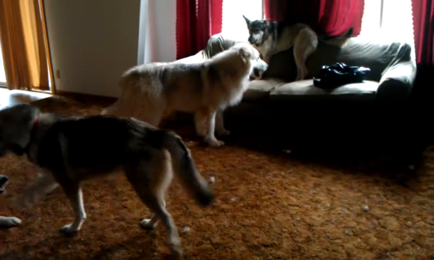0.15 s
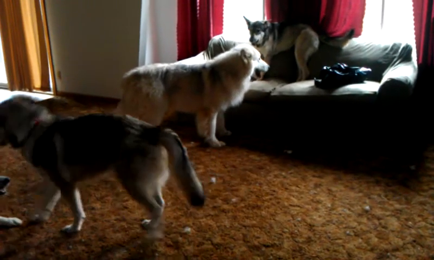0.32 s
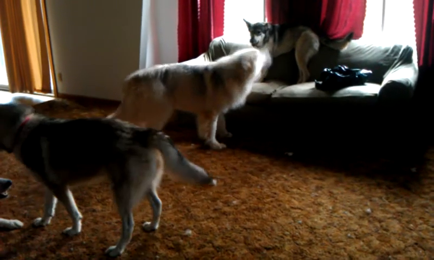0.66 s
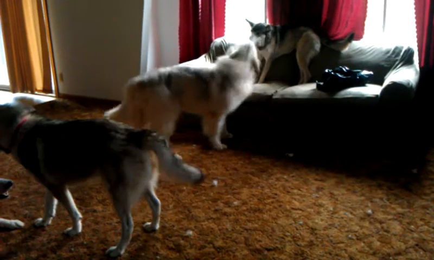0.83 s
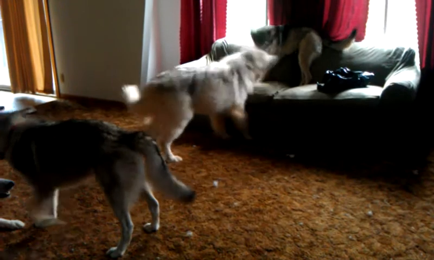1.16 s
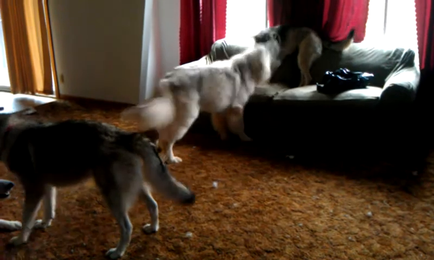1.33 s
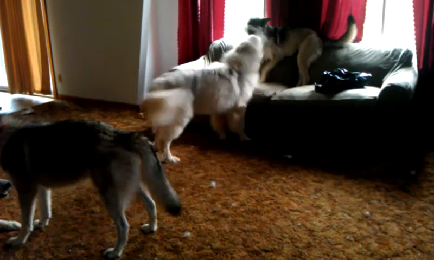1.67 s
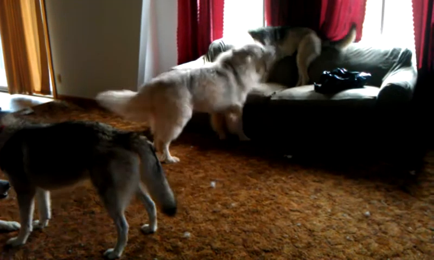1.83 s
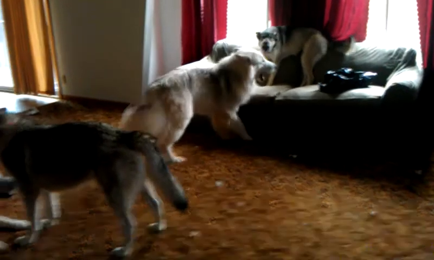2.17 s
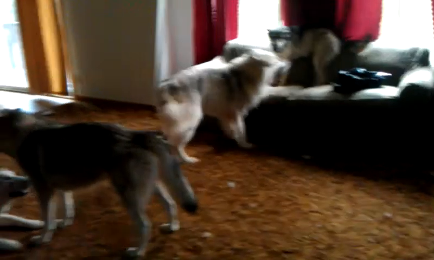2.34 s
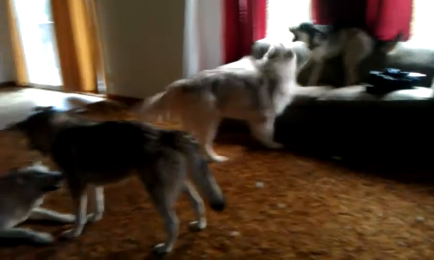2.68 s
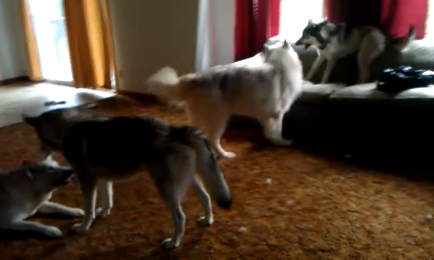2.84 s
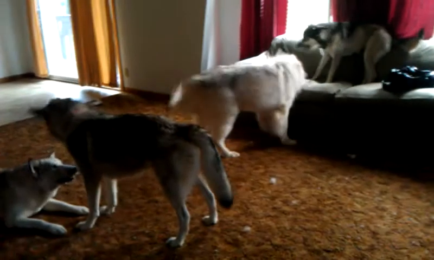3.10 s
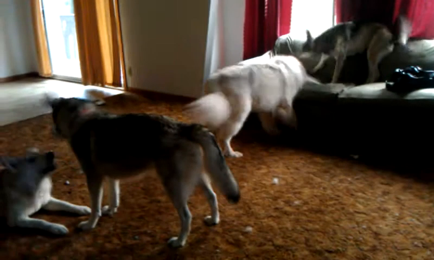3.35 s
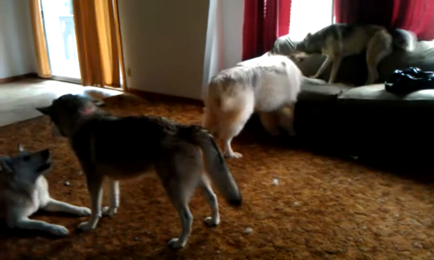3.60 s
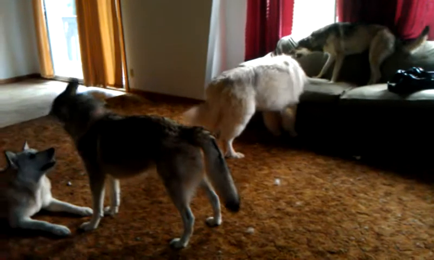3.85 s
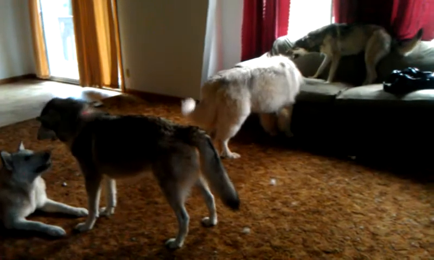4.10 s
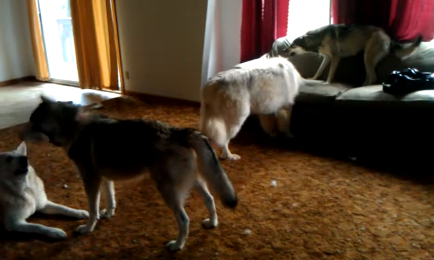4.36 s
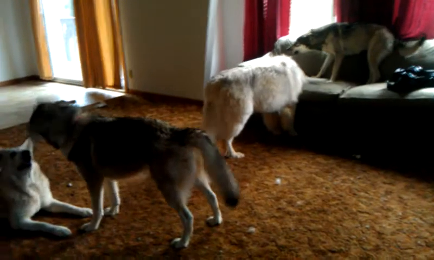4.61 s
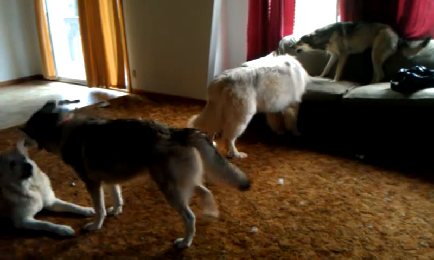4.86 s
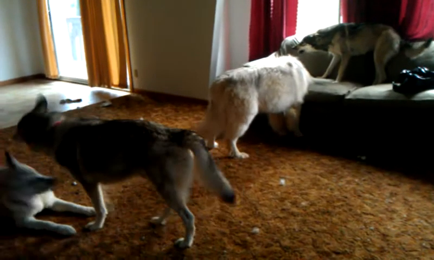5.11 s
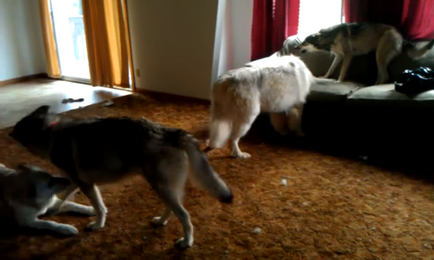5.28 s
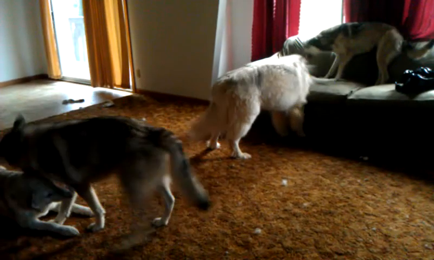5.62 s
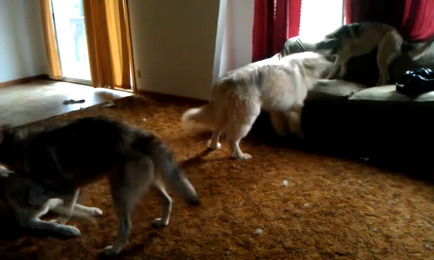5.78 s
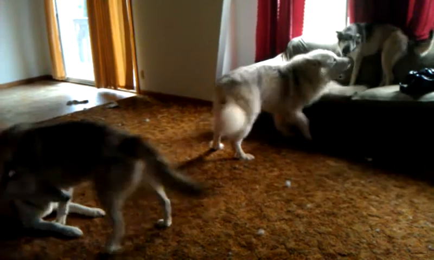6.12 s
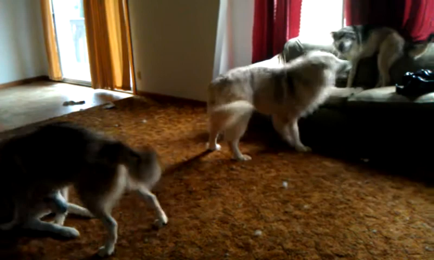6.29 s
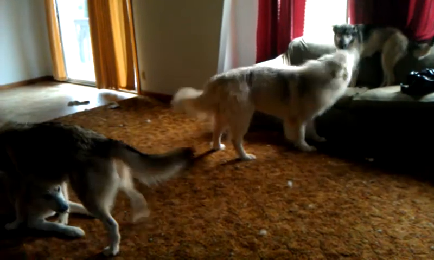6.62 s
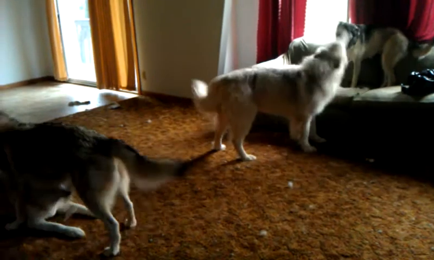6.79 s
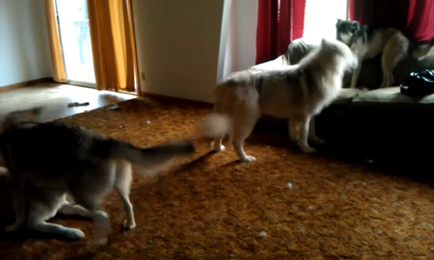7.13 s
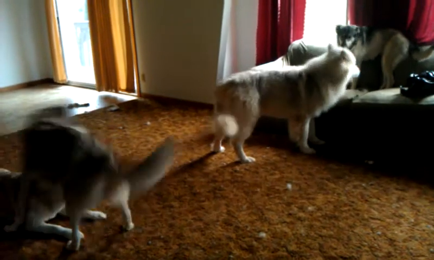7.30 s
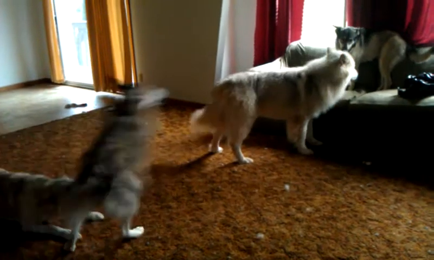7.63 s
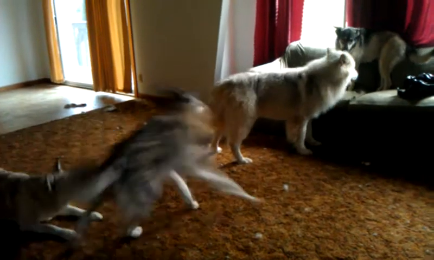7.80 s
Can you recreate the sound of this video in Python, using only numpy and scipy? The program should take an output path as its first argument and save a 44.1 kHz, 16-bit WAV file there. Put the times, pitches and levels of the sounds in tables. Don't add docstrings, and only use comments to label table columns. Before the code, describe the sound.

High-pitched yips, hoarse barks and a few round woofs from playing dogs echo indoors over faint hum, then fall quiet to soft carpet steps.

```python
import sys
import numpy as np
from scipy import signal
from scipy.fft import rfft, irfft, next_fast_len
from scipy.io import wavfile
from scipy.ndimage import map_coordinates

SR = 44100
rng = np.random.default_rng(int(sys.argv[2]) if len(sys.argv) > 2 else 0)


def digitize_waveform(pressure):
    field = np.atleast_2d(pressure).T
    bounded = np.clip(field, -1, 1)
    quanta = np.round(bounded * 32767).astype(np.int16)
    wavfile.write(sys.argv[1], SR, quanta)


def to_linear_factor(level_db):
    exponent = np.asarray(level_db, float) / 20
    return 10 ** exponent


N = 350771


def dogs():
    # full voice at t/s, hold t/s, pitch f/Hz, level/dB,
    # mouth resonance [multiples of the pitch]
    barks = [
        (2.065, 0.069, 680.8, -14, 2.3),
        (2.57, 0.1, 696.5, -21, 2.2),
        (3.635, 0.071, 673.8, -20, 2.1),
        (4.155, 0.077, 673.8, -19, 2.1),
        (4.755, 0.084, 635, -21.5, 1.9),
        (5.605, .085, 642.3, -19.5, 2.1),
        (6.195, 0.095, 664, -18, 2.7),
    ]
    yelps = [
        (.542, 0.051, 609.7, -12, 3.86),
        (.74, 0.053, 522.8, -15, 3.62),
        (5.415, 0.074, 568.8, -18, 4.8),
    ]
    swells = [
        (1.05, 0.058, 551.1, -10, 3.52),
        (1.765, .05, 545.3, -11, 3.51),
        (5.85, .065, 520.1, -16, 3.05),
    ]
    woofs = [
        (6.06, .09, 452.8, -13.5, 2.51),
        (6.645, .03, 398.6, -16, 1.3),
        (6.93, 0.06, 446, -20, 2.13),
    ]
    whines = [
        (.235, 0.016, 816, -32.5, 2.05),
        (1.64, 0.027, 595, -26, 2.05),
        (7.22, .025, 591.3, -25.5, 2.18),
    ]
    cries = [
        (.512, .015, 530, -36, 2.2),
        (5.385, .015, 530, -41.5, 1.55),
        (2.9, 0.061, 577.6, -30.5, 2.4),
        (3.08, 0.083, 528.7, -20, 3),
        (5.785, 0.069, 522, -27, 2.14),
    ]
    gruffs = [
        (2.415, .05, 525.8, -19.5, 2.7),
        (.99, 0.038, 503.6, -28.5, 1.7),
        (1.225, 0.036, 706.5, -26, 0.88),
        (2.355, .06, 610.6, -19.5, 1.1),
        (3.335, 0.043, 716.5, -19, 2.3),
        (6.395, 0.035, 409.2, -21, 3.5),
        (6.9, .1, 647.7, -31.5, 0.98),
    ]
    joins = [
        (.538, 0.017, 528.3, -20.5, 2.05),
        (.63, .03, 428.3, -24, 1.95),
        (1.0, 0.04, 439, -28, 2.05),
        (1.48, .03, 381, -46, 1.9),
        (1.55, .03, 370.5, -52, 2.8),
        (2.105, .03, 455.3, -30, 2.05),
        (2.35, .09, 433.2, -19, 2.05),
        (3.055, 0.024, 448.3, -23.5, 2.05),
        (3.365, 0.024, 447.7, -30.5, 2.05),
        (6.4, .03, 596.3, -28, 1.8),
    ]
    again = [
        (.685, 0.023, 617.3, -28.5, 0.94),
        (.8, .045, 528.8, -14, 4.44),
        (.89, 0.017, 525, -17.5, 0.76),
        (6.455, 0.021, 449.4, -13.5, 1.97),
        (6.505, 0.022, 451, -23.5, 1),
        (6.69, .03, 434.4, -19.5, 2.7),
        (6.725, .04, 427, -20.5, 1.68),
    ]
    coughs = [(.335, .03, 520, -38, 1.1), (.285, .03, 661, -22.5, 1.36), (.625, 0.03, 596.4, -18, 1.34),
              (1.68, 0.035, 522, -21.5, 2.4), (1.71, 0.049, 441.7, -20.5, 2.05),
              (2.63, 0.043, 661.3, -19.5, 1.2), (3.405, 0.019, 694, -26, 1.58),
              (3.63, 0.022, 586.3, -19.5, 0.98), (6.97, .03, 599, -22.5, 0.78),
              (3.745, 0.03, 727, -24.5, 1.43), (4.26, 0.019, 656, -27, 0.88),
              (4.88, 0.026, 639.4, -31.5, 0.88), (6.3, 0.023, 612.4, -22.5, 2.74)]
    # lead-in t/s, how far down it starts level/dB, release t/s,
    # how far down it ends level/dB, fade over the hold level/dB
    breaths = dict(bark=(.055, 33.8, .04, 15, 3.95), yelp=(0.044, 33, 0.036, 13, 3),
               swell=(.035, 21, .04, 20, 2), woof=(0.041, 42, .04, 14, 3.4),
               whine=(.045, 22, .05, 7.7, 3.2), cry=(.045, 19, .04, 8, 4), gruff=(.045, 28, 0.044, 15, 4.7),
               join=(0.019, 19, 0.026, 15, 9), again=(0.02, 31, .035, 15, 3.5),
               cough=(.025, 22, .035, 12, 4.4))
    # how far below it starts [share], settling t/s, climb [share per second]
    glides = dict(bark=(.28, .035, 0), yelp=(.24, .022, -.1), swell=(.04, .02, .05), woof=(.17, .025, .45),
              whine=(.15, .02, 0), cry=(.33, .016, -.25), gruff=(.1, .025, .3), join=(.05, .02, .4),
              again=(.02, .02, .3), cough=(-.06, .03, -.7))
    # shut partials 2 and 3 level/dB, lift at the resonance level/dB,
    # its width [partials], opening at start and at end [0-1]
    mouths = dict(bark=(-5, -8, 13.5, 1.38, -0.4, 0.05), yelp=(-15, -22.5, 21, 1.34, 0.1, 0.8),
              swell=(-19.5, -25.5, 26, 0.81, 1.82, 0.62), woof=(-12, -15, 13, .6, .7, .6),
              whine=(-7, -13, 21.5, 1, 1.2, 0.56), cry=(-7, -11.5, 15.5, 1.68, 1.3, 0.64),
              gruff=(-10.5, -20, 15, 2.7, 2.7, 1.56), join=(-7, -22, 25, .6, .9, .9),
              again=(-17.5, -21, 23.5, 1.18, 0.1, .5), cough=(-10.5, -23.5, 21.5, 0.66, 2.3, 1.04))
    shakes = dict(bark=.08, yelp=.009, swell=.006, woof=.006, whine=.008, cry=.008, gruff=.035, join=.04, again=.006, cough=.045)
    # hoarse noise level/dB, upper partials level/dB, brightness level/dB,
    # final pitch drop [share], room level/dB
    voices = dict(bark=(-8.5, 2.5, -33, .12, -9.5), yelp=(-24.5, -28.5, -39.5, .25, -6.5),
              swell=(-19, -24, -42.5, .25, -12.5), woof=(-21.5, -40, -43, .2, -7.5),
              whine=(-17, -6, -26.5, .3, -5.5), cry=(-14, -8, -29.5, .2, -7.5),
              gruff=(-7, -12, -34.5, .15, -5), join=(-6, -19, -41, .05, -8.5),
              again=(-19, -29, -43.5, .25, -9), cough=(-11.5, -12.5, -31.5, .12, -9.5))
    # start t/s, end t/s, pitch f/Hz, level/dB
    growls = [
        (6.8, 6.99, 148, -67),
        (6.33, 6.52, 170, -59.5),
        (3.217, 3.52, 189, -63),
        (6.995, 7.197, 161, -67.5),
    ]

    kinds = dict(bark=barks, yelp=yelps, swell=swells, woof=woofs, whine=whines, cry=cries,
                 gruff=gruffs, join=joins, again=again, cough=coughs)
    calls = []
    for kind, rows in kinds.items():
        for row in rows:
            path = gesture(row, breaths[kind], glides[kind], mouths[kind])
            calls.append((path, shakes[kind], *voices[kind]))
    for start, end, hz, db in growls:
        path = [(start, hz, db, db + 17.0, db + 0.5), (end, hz, db, db + 5.5, db + 4.0)]
        calls.append((path, .12, -14, -20, -40, .1, -8))

    out = np.zeros(N + SR)
    for path, *voice, room_db in calls:
        sound = in_room(call(path, *voice), room_db)
        first = round(path[0][0] * SR)
        out[first:first + len(sound)] += sound
    return out[:N]


def gesture(row, breath, glide, mouth):
    full_s, hold_s, hz, db, resonance = row
    lead_s, lead_db, release_s, release_db, fade_db = breath
    scoop, scoop_s, climb = glide
    second_db, third_db, lift_db, width, first, last = mouth
    end_s = hold_s + release_s
    since = np.r_[np.linspace(-lead_s, 0, 4), np.linspace(0, hold_s, 5)[1:], end_s]
    pitch = hz * (1 - scoop * np.exp(-(since + lead_s) / scoop_s) + climb * (since - hold_s / 2))
    down_db = np.interp(since, [-lead_s, 0, hold_s, end_s], [lead_db, 0, fade_db, fade_db + release_db])
    opening = np.interp(since, [-lead_s, hold_s / 3, end_s], [first, 1, last])
    lift = lift_db * np.exp(-((np.arange(1, 4) - resonance) / width) ** 2)
    partials = np.array([[0], [second_db], [third_db]]) + lift[:, None] * opening
    partials = partials - 10 * np.log10(np.sum(to_linear_factor(partials) ** 2, axis=0))
    return np.c_[full_s + since, pitch, (db - down_db + partials).T]


def call(path, shake, hoarse_db, upper_db, hiss_db, drop):
    # f/Hz, level/dB
    throat = [(200, -35), (400, -7.5), (700, 2), (1400, -3.5), (2300, -14.5), (2900, -35), (4000, -48.5),
              (8000, -72)]
    # f/Hz, level/dB
    nose = [(2000, -44.5), (3000, -26), (3700, -8.5), (4700, -6), (5800, -5.5), (7500, -10), (10000, -19.5),
            (15000, -29)]
    s, *columns = np.transpose(path)
    t = np.arange(round(s[0] * SR), round(s[-1] * SR)) / SR
    since, left = t - s[0], s[-1] - t
    pitch, *level_db = [np.interp(t, s, column) for column in columns]
    pitch = pitch * (1 - drop * np.clip(1 - left / 0.041, 0, 1) ** 2)

    strain = np.clip((since - .03) / .05, .06, 1)
    unsteady = .75 * shake * strain * wobble(320, len(t))
    turn = 2 * np.pi * np.cumsum(pitch * (1 + unsteady)) / SR

    def shimmer():
        return to_linear_factor(60 * shake * strain * wobble(160, len(t)))

    voice = np.zeros(len(t))
    for k, db in enumerate(level_db):
        voice += np.sqrt(2) * to_linear_factor(db) * shimmer() * np.sin((k + 1) * turn + k)
    loud = np.sqrt(sum(to_linear_factor(db) ** 2 for db in level_db))
    for k in (4, 5):
        upper = to_linear_factor(upper_db + along(throat, k * pitch))
        voice += loud * upper * shimmer() * np.sin(k * turn + k * k)
    leak = (0.35 + strain) * to_linear_factor(hoarse_db) * gated_noise(turn, throat)

    buzz = np.zeros(len(t))
    for k in range(6, 22):
        buzz += to_linear_factor(along(nose, k * pitch) + 5 * wobble(25, len(t))) * np.sin(k * turn + k * k)
    airy = np.clip(.3 + 14 * shake * strain, 0, 1)
    bright = airy * gated_noise(turn, nose) + (1 - airy) * unit(buzz)
    hiss = to_linear_factor(hiss_db) * bright * loud ** -.15
    hiss = (0.48 + 0.72 * strain) * to_linear_factor(2.7 * wobble(41, len(t))) * hiss
    edge = np.clip(np.minimum(since / .02, left / .015), 0, 1)
    return edge * (voice + loud * (leak + hiss))


def gated_noise(turn, colour):
    puffs = rng.standard_normal(SR)[:len(turn)] * (1 + 2.3 * np.cos(turn))
    return unit(filtered(puffs, lambda hz: to_linear_factor(along(colour, hz))))


def in_room(x, room_db):
    # f/Hz, t/s
    fade_times = [(200, 0.72), (800, 0.35), (2000, 0.4), (5500, 0.58), (12000, 0.4)]
    hz, t, z = signal.stft(rng.standard_normal(int(.7 * SR)), SR, nperseg=256)
    fading = z * to_linear_factor(-60 * t / along(fade_times, hz)[:, None])
    tail = signal.istft(fading, SR, nperseg=256)[1]
    answer = to_linear_factor(room_db) * np.pad(tail, (500, 0)) / np.linalg.norm(tail)
    answer[0] = 1
    return signal.fftconvolve(x, answer)


def paws():
    # t/s, level/dB
    steps = [
        (7.488, -78),
        (7.581, -59),
        (7.906, -54),
        (7.938, -61.5),
    ]
    out, t = np.zeros(N + SR), np.arange(SR // 10) / SR
    for s, db in steps:
        knock = np.sin(2 * np.pi * 165 * t) * (1 - np.exp(-t / 0.0023)) * to_linear_factor(-60 * t / 0.11)
        scuff = to_linear_factor(-27 - 60 * t / 0.019) * rng.standard_normal(len(t))
        first = round(s * SR)
        out[first:first + len(t)] += to_linear_factor(db) * (knock + scuff)
    return out[:N]


def room_tone():
    # f/Hz, level/dB per Hz
    air_colour = [(25, -52.5), (90, -44.5), (125, -20.5), (200, -14), (310, -6), (450, -19.5), (620, -17.5),
                  (1300, -21), (2500, -27), (5000, -33.5), (9000, -34), (15000, -52)]
    # f/Hz, level/dB
    hum_tones = [(118.4, -76), (166.9, -80.5)]
    # from t/s, to t/s, level/dB, slide t/s
    gate = [
        (0, 0.173, -3, .02),
        (4.6, 4.68, -5, 0.16),
        (5.2, 5.3, -5, .1),
        (5.274, 5.332, -18, 0.016),
        (7.63, 7.953, -5, 0.078),
        (7.76, 7.88, -9, .04),
    ]
    t = np.arange(N) / SR
    air = unit(filtered(rng.standard_normal(N), lambda hz: to_linear_factor(along(air_colour, hz))))
    air = to_linear_factor(-66.5 + 2.7 * wobble(1.1, N)) * air
    hum = np.zeros(N)
    for hz, db in hum_tones:
        hum += np.sqrt(2) * to_linear_factor(db + 1.5 * wobble(26, N)) * np.sin(2 * np.pi * hz * t)
    duck_db = np.zeros(N)
    for shut, back, db, slide_s in gate:
        duck_db += db * np.clip(np.minimum(t - shut, back - t) / slide_s + 1, 0, 1)
    return (air + hum) * to_linear_factor(duck_db - 1)


def unit(x):
    return x / np.sqrt(np.mean(x ** 2) + 1e-20)


def along(points, hz):
    f, v = np.transpose(points)
    return np.interp(np.log(hz + 1), np.log(f + 1), v)


def filtered(x, response):
    m = next_fast_len(len(x) + 8192)
    return irfft(rfft(x, m) * response(np.fft.rfftfreq(m, 1 / SR)), m)[:len(x)]


def wobble(rate, size):
    knots = rng.standard_normal(int(max(size, SR) * rate / SR) + 4)
    return map_coordinates(knots, [np.arange(size) * rate / SR])


def scene():
    return (dogs() + paws() + room_tone())[None]


def top_cut(x):
    return signal.sosfilt(signal.butter(12, 15730, fs=SR, output="sos"), x)


def record(dry):
    # t/s, level/dB
    limits = [(.57, -10.5), (.8, -13.5), (1.08, -7.5), (1.79, -10), (2.1, -10.5), (2.4, -14), (2.64, -13),
              (3.35, -11.5), (3.69, -9.5), (4.19, -11.5), (5.44, -14), (5.64, -11.5), (6.1, -10.5),
              (6.24, -14), (6.47, -12), (6.66, -13.5), (6.94, -10)]
    ceiling = to_linear_factor(np.interp(np.arange(N) / SR, *np.transpose(limits)))
    top = ceiling * np.where(dry[0] > 0, 1, 1.03)
    clipped = dry[0] / (1 + np.abs(dry[0] / top) ** 24) ** (1 / 24)
    mix = filtered(clipped, lambda hz: (1j * hz / (40 + 1j * hz)) ** 2)
    return top_cut(mix[None])


dry = scene()
out = record(dry)
digitize_waveform(out)
```